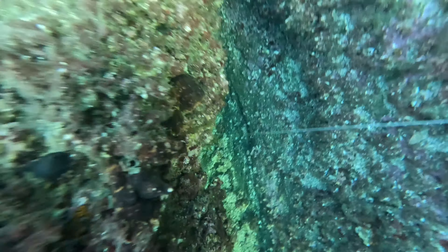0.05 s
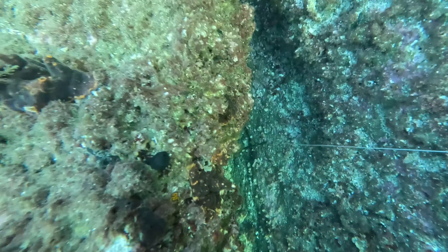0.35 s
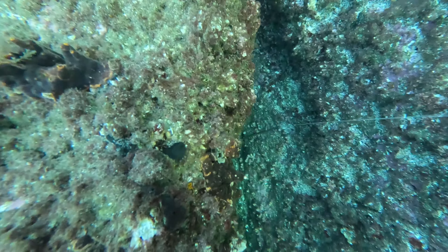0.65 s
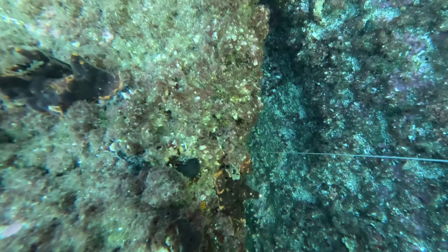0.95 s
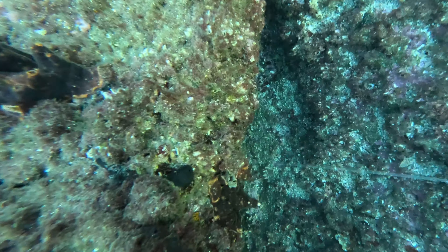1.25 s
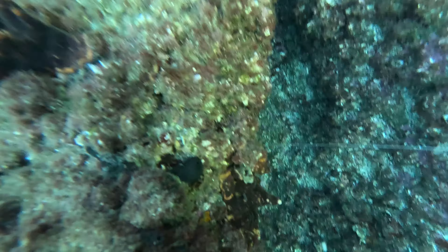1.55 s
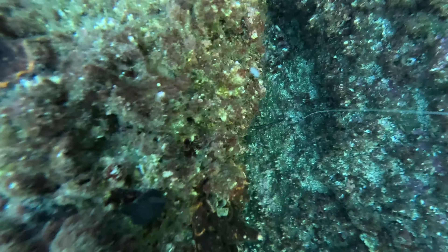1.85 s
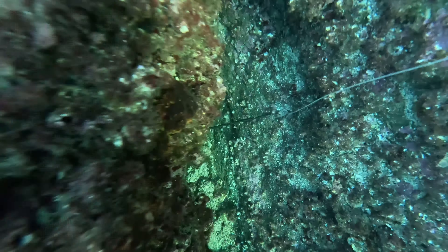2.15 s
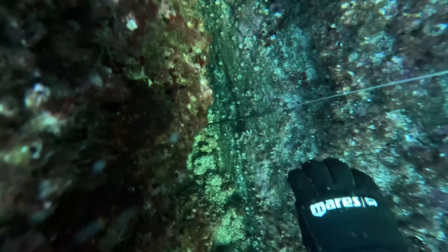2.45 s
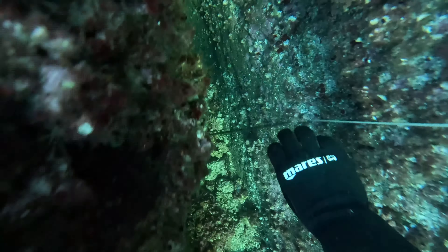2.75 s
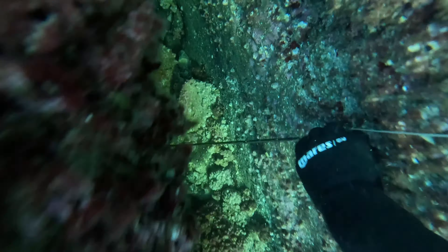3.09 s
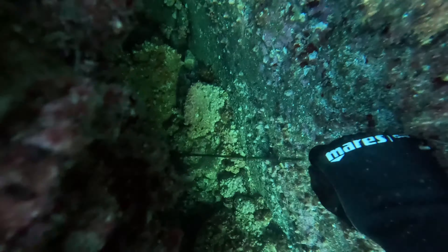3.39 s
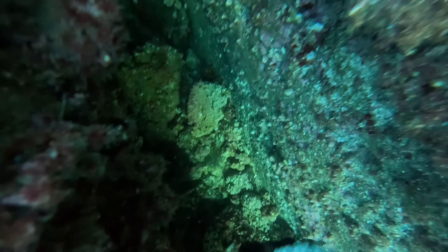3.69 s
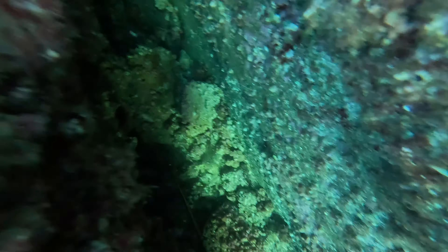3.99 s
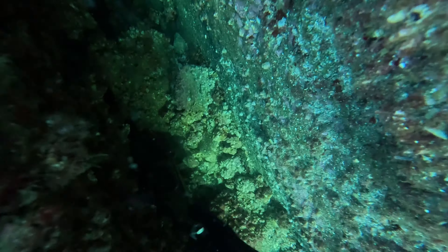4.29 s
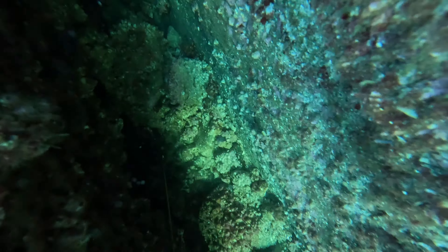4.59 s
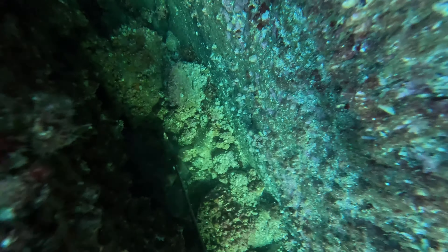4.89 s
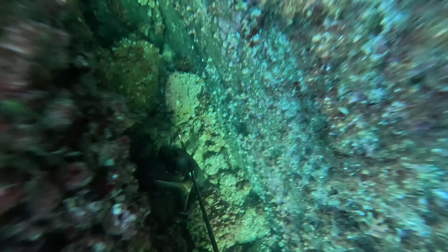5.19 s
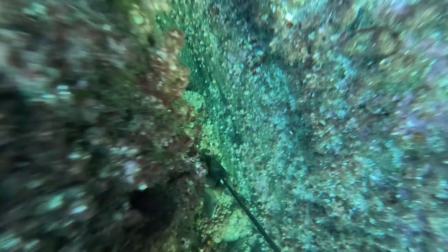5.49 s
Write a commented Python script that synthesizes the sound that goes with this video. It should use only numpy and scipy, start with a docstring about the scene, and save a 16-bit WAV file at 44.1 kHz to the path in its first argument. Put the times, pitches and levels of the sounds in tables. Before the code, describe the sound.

Snapping shrimp crackle underwater throughout, with sharp single ticks nearby and a fine, flickering fizz farther along the reef, all heard from inside a resonant camera housing. Under it runs a low, uneven rumble of water moving past the case. A brief rub and squeak open the sound, followed by a soft gurgle and faint bubble chirps around 0.5 seconds. A small knock comes at 1.3 seconds, and soft, dull water bumps follow between 1.9 and 2.6 seconds. The sharpest snaps stand out near 2.7 to 2.9 seconds. At 3.2 seconds the loudest knock starts a quick run of close clacks, low thumps and rubs lasting until about 3.7. A dull gurgling bump with a short squeak lands near 4 seconds, where the crackle thins slightly. Faint rubbing follows, then two knocks around 4.8 seconds and a gentle swell of water near 5.5.

```python
"""Snapping shrimp crackle all around a diver's camera as it glides along a rocky reef.
Each snap is a tiny bubble collapsing: a few close by, thousands farther out, a fizz beyond.
Two microphones sit inside the waterproof housing, whose resonances colour every tick.
Right at the case, water sloshes past with soft gurgles, dull thumps and a few chirping bubbles;
handling rubs and squeaks on the shell, and knocks make it clack and thump."""
import sys
import numpy as np
from scipy import signal
from scipy.fft import rfft, irfft, next_fast_len
from scipy.io import wavfile
from scipy.ndimage import map_coordinates

SR = 44100
rng = np.random.default_rng(int(sys.argv[2]) if len(sys.argv) > 2 else 0)


def log_audio(samples):
    """Write samples as a 16-bit WAV file to the path given in sys.argv[1]."""
    # one column per channel
    frames = np.atleast_2d(samples).T
    # limit to full scale, then quantise
    limited = np.clip(frames, -1, 1)
    pcm = np.round(limited * 32767).astype(np.int16)
    wavfile.write(sys.argv[1], SR, pcm)


N = 244163
T = np.arange(N) / SR

# The whole reef's crackle along the way. Each row: time in seconds, relative level in dB.
REEF_LEVEL = [(0.0, -46), (0.48, -48), (0.85, -45.5), (1.26, -48), (2.47, -48), (3.55, -51), (4.01, -53.5),
              (5.54, -49.5)]
# Resonances of the housing. Each row: centre in Hz, width in Hz, relative level in dB.
HOUSING_MODES = [(990, 190, -17), (1501, 170, 0.5), (2880, 498, 6.5), (3528, 260, 3), (4107, 200, -2.5),
                 (4986, 475, 4), (5870, 203, -3), (6400, 480, -4.5), (7454, 350, -2.5), (8420, 890, -13.5),
                 (10200, 2200, -28.5), (12100, 1000, -41)]


def amp(db):
    return 10 ** (np.asarray(db) / 20)


def unit_rms(x):
    return x / np.sqrt(np.mean(x ** 2) + 1e-20)


def along(points, hz):
    """(Hz, value) points joined on a log frequency axis."""
    point_hz, values = np.transpose(points)
    return np.interp(np.log(hz + 1), np.log(point_hz + 1), values)


def curve(rows, t):
    """(seconds, value) rows joined by straight lines."""
    return np.interp(t, *np.transpose(rows))


def wobble(rate):
    """A smooth random curve with `rate` knots a second."""
    return map_coordinates(rng.standard_normal(int(N * rate / SR) + 4), [np.arange(N) * rate / SR])


def add(out, start_s, x):
    """Mix x into out at a time."""
    start = round(start_s * SR)
    part = x[max(-start, 0):N - start]
    out[max(start, 0):][:len(part)] += part


def filtered(x, response):
    """Pass x through a complex response, given as a function of Hz."""
    size = 2 * next_fast_len(N // 2 + SR // 4)
    hz = np.fft.rfftfreq(size, 1 / SR)
    return irfft(rfft(x, size) * response(hz), size)[..., :N]


def noise(spectrum):
    """Noise of rms 1, coloured by (Hz, dB) points and rolled off from the last one."""
    white = rng.standard_normal(N)
    top_hz = spectrum[-1][0]
    return unit_rms(filtered(white, lambda hz: amp(along(spectrum, hz)) / (1 + (hz / top_hz) ** 4)))


def resonances(modes, hz):
    """Causal (minimum-phase) response of a set of modes, with a mean power of 1."""
    power = sum(amp(db) ** 2 / (1 + ((hz - centre) / (0.81 * width)) ** 2) ** 2
                for centre, width, db in modes)
    cepstrum = irfft(np.log(power / power.mean() + 1e-12) / 2)
    half = len(cepstrum) // 2
    causal_fold = np.r_[1, np.full(half - 1, 2), 1, np.zeros(half - 1)]
    return np.exp(rfft(cepstrum * causal_fold))


def snaps(times, level_db, bright_db, colour_db, split_hz=4700, spread_s=0.0015, path_count=5):
    """Each snap reaches the case by a few paths and has its own brightness and colour."""
    size = 256
    lead_in = size // 5
    hz = np.fft.rfftfreq(size, 1 / SR)
    delay = lead_in + (rng.uniform(0, spread_s, (len(times), path_count)) * SR).astype(int)
    strength = 0.9 * rng.standard_normal(delay.shape)
    delay[:, 0], strength[:, 0] = lead_in, 1.0  # the direct path
    # every path reaches the two microphones with slightly different strength
    skew = 0.2 * rng.standard_normal(strength.shape) * strength
    paths = np.zeros((2, len(times), size))
    paths[:, np.arange(len(times))[:, None], delay] = strength + skew, strength - skew
    treble = 1 - 1 / (1 + (hz / split_hz) ** 5)
    # the direction of arrival favours different parts of the case: a random gain every 2 kHz or so
    colour = signal.resample(rng.standard_normal((len(times), 11)), len(hz), axis=1)
    spectra = rfft(paths) * amp(bright_db[:, None] * treble + colour_db * colour)
    energy = np.mean(np.abs(spectra * resonances(HOUSING_MODES, hz)) ** 2, axis=(0, 2))
    gain = amp(level_db) * np.sqrt(0.004 * SR / energy)  # level over 4 ms, inside the housing
    pulses = irfft(spectra) * gain[:, None]
    at = (times * SR).astype(int)[:, None] + np.arange(size)
    return np.array([np.bincount(at.ravel(), side.ravel(), N + size)[lead_in:][:N] for side in pulses])


def colony(count=2450, nearest_count=36, top_db=-37.5, fall_db_per_decade=13):
    """Shrimp cover the rock: the farther out, the more of them and the fainter."""
    times = rng.uniform(0, N / SR, count)
    distance_db = top_db - fall_db_per_decade * np.log10(1 + np.arange(count) / nearest_count)
    busy_db = curve(REEF_LEVEL, times) - curve(REEF_LEVEL, T).mean()
    bright_db = -4 + 6 * rng.standard_normal(count)
    return snaps(times, distance_db + busy_db, bright_db, colour_db=4.5)


def far_fizz(gain_db=-9, airy_db=4, stereo_spread=0.056):
    """Far down the reef, the snaps merge into a flickering hiss."""
    hiss = rng.standard_normal(N) + stereo_spread * rng.standard_normal((2, N))
    hiss = filtered(hiss, lambda hz: amp(along([(4000, 0), (9000, airy_db)], hz)))
    flicker_db = 3.3 * wobble(75) + 2.6 * wobble(22.57)
    return amp(curve(REEF_LEVEL, T) + gain_db + flicker_db) * hiss


def rock_echo(x, t60=0.074):
    """A short scatter of echoes off the nearby rock."""
    t = T[:SR // 8]
    tail = rng.standard_normal(len(t)) * amp(-60 * t / t60)
    return signal.fftconvolve(x, tail[None] / np.linalg.norm(tail), axes=1)[:, :N]


def shrimp(echo_db=-18, low_cut_hz=1100):
    """Close snaps, the colony, their echo and the far fizz all come in through the housing."""
    # The shrimp nearest the camera. Each row: start in seconds, relative level in dB,
    # relative treble lift in dB.
    close_snaps = [(0.1403, -36, -14), (0.476, -31.5, -17), (0.5383, -32.5, -17), (0.5862, -38.5, -2),
                   (0.746, -40, -19), (0.7921, -35.5, -10), (0.904, -35, -10), (0.9808, -39, -17),
                   (1.0526, -32, 3.5), (1.454, -39, -22), (1.4658, -31, 6.5), (1.518, -36, -14),
                   (1.624, -39, -24), (1.836, -35, -31), (1.8755, -37.5, -9), (2.1956, -46, 9),
                   (2.2092, -36, -31), (2.665, -35.5, -10), (2.6984, -27.5, 1.5), (2.7992, -44.5, -1),
                   (2.8626, -35, -27), (2.87, -30.5, 15.5), (2.9306, -39, -25), (3.847, -58, 4),
                   (4.067, -28.5, -12), (4.203, -40.5, 1), (4.4379, -30, -14), (4.5261, -38.5, -2),
                   (5.1605, -37, -6), (5.2438, -37.5, -13), (5.3389, -38, -7)]
    times, level_db, bright_db = np.transpose(close_snaps)
    crackle = snaps(times, level_db + 1, bright_db + 5, colour_db=2) + colony()
    # a tiny collapsing bubble radiates hardly any low sound
    crackle = signal.sosfilt(signal.butter(2, low_cut_hz, "high", fs=SR, output="sos"), crackle)
    outside = crackle + far_fizz() + amp(echo_db) * rock_echo(crackle)
    return filtered(outside, lambda hz: resonances(HOUSING_MODES, hz))


def sloshing(gain_db=6, unrest_db=2):
    """Slow pressure swings on the case as it moves through the water."""
    # The flow past the case. Each row: time in seconds, relative level in dB.
    flow_level = [(0.0, -38), (0.17, -49), (1.96, -47.5), (2.07, -45), (2.11, -45), (3.64, -38),
                  (3.85, -47.5), (3.98, -37.5), (4.29, -51), (4.35, -44), (5.4, -54), (5.54, -39.5)]
    # Its deep rumble. Each row: frequency in Hz, relative level in dB.
    flow_spectrum = [(12, 4), (22, -2), (38, -0.5), (62, -15), (100, -15.5), (150, -25), (250, -43.5),
                     (450, -58.5), (650, -82), (950, -61), (1500, -46)]
    return amp(curve(flow_level, T) + gain_db + unrest_db * wobble(11)) * noise(flow_spectrum)


def low_swells(side_db=-7, side_hz=380):
    """Low swells at the case: soft gurgles and a few brief, dull thumps."""
    # Each row: middle in seconds, half length in seconds, relative level in dB.
    swells = [(.015, 0.017, -34), (.29, 0.038, -44.5), (.52, 0.035, -35.5), (.865, 0.031, -49.5),
              (1.344, 0.0032, -28), (2.38, 0.032, -48.5), (3.258, 0.013, -32.5), (3.53, 0.11, -46),
              (3.905, .028, -34.5), (3.964, 0.0066, -22.5), (4.025, 0.032, -34.5), (5.48, 0.13, -48.5)]
    # Their dull colour. Each row: frequency in Hz, relative level in dB.
    swell_spectrum = [(50, 6), (100, 8), (160, 9), (230, -2), (310, -13), (380, -14.5), (470, -32),
                      (600, -32), (900, -74), (2000, -67)]
    # the upper part differs at the two microphones
    side = filtered(noise(swell_spectrum), lambda hz: hz ** 2 / (hz ** 2 + side_hz ** 2))
    low_noise = noise(swell_spectrum) + amp(side_db) * np.array([side, -side])
    envelope = sum(amp(db) / (1 + ((T - middle_s) / half_s) ** 2 / 2) ** 2
                   for middle_s, half_s, db in swells)
    return envelope * low_noise


def microphone_rush(level_db=-59):
    """A soft rush, separate at each microphone, that rises and falls with the reef."""
    # The colour of the rush. Each row: frequency in Hz, relative level in dB.
    rush_spectrum = [(20, 14.5), (60, -6.5), (130, -15), (250, -22.5), (450, -24.5), (900, -23),
                     (2000, -19.5), (4000, -45), (7000, -22), (10000, -24.5), (13000, -31), (17000, -64)]
    reef_db = curve(REEF_LEVEL, T)
    envelope = amp(level_db + 0.5 * (reef_db - reef_db.mean()))
    return envelope * np.array([noise(rush_spectrum), noise(rush_spectrum)])


def glides(rows, pitch_change, waver=0.037, stutter_db_at_2khz=3):
    """Brief, unsteady tones that glide by a share of their pitch; higher ones stutter more."""
    out = np.zeros(N)
    unsteady = 1 + waver * wobble(500)
    stutter = wobble(220)
    for start_s, length_s, start_hz, db in rows:
        progress = np.clip((T - start_s) / length_s, 0, 1)
        hz = start_hz * (1 + pitch_change * progress) * unsteady
        level_db = db + stutter_db_at_2khz * stutter * start_hz / 2000
        out += amp(level_db) * np.sin(np.pi * progress) * np.sin(2 * np.pi * np.cumsum(hz) / SR)
    return out


def squeaks():
    """Rubbing on the case sticks and slips; the pitch falls as each slip slows."""
    # Each row: start in seconds, length in seconds, starting pitch in Hz, relative level in dB.
    slips = [(.005, .031, 2955, -43), (1.338, 0.012, 330, -39.5), (3.595, 0.014, 3400, -35),
             (3.923, 0.042, 1070, -44), (3.954, .017, 423.4, -29), (4.26, .07, 3100, -54),
             (4.52, .06, 3770, -52)]
    return glides(slips, pitch_change=-0.144)


def shell_ring(force, main_hz, sharpness=1.95, floor=0.066):
    """The shell answers a force; the place of contact favours the modes near one frequency."""
    # The shell's modes under contact. Each row: centre in Hz, width in Hz, relative level in dB.
    shell_modes = [(328, 137, 2.5), (660, 280, -0.5), (920, 183, 3), (1380, 150, 1), (1560, 105, 3),
                   (1860, 96, 1), (2900, 690, -1.5), (3620, 280, -0.5), (6200, 3200, -9)]
    size = 2 * next_fast_len(len(force) // 2 + 1024)
    hz = np.fft.rfftfreq(size, 1 / SR)
    focus = 1j * hz * main_hz / (sharpness * (main_hz ** 2 - hz ** 2) + 1j * hz * main_hz)
    response = resonances(shell_modes, hz) * (floor + focus)
    return irfft(rfft(force, size) * response / np.sqrt(np.mean(np.abs(response) ** 2)))


def rubs(rough_db=4):
    """Uneven friction on the shell, right beside the microphones."""
    # Each row: middle in seconds, half length in seconds, relative level in dB, main frequency in Hz.
    strokes = [(0.019, 0.016, -36.5, 2850), (0.357, 0.028, -57.5, 794), (0.695, 0.088, -61.5, 1020),
               (1.323, 0.014, -44, 1490), (2.009, 0.019, -58, 940), (3.25, 0.035, -41.5, 1240),
               (3.389, 0.096, -58.5, 950), (3.593, 0.055, -45.5, 3020), (3.766, 0.035, -52.5, 685),
               (3.946, .055, -48, 546), (4.288, 0.12, -58, 3300), (4.52, 0.083, -59, 3370)]
    out, t = np.zeros(N), T[:SR // 4]
    centre_s, knots = t.mean(), t[::150]
    for middle_s, half_s, db, main_hz in strokes:
        grip = amp(rough_db * np.interp(t, knots, rng.standard_normal(len(knots))))
        envelope = np.exp(-((t - centre_s) / half_s) ** 2)
        force = unit_rms(grip * rng.standard_normal(len(t))) * envelope
        add(out, middle_s - centre_s, amp(db) * shell_ring(force, main_hz))
    return out


def bubbles():
    """Small bubbles chirp upwards as they near release."""
    # Each row: start in seconds, length in seconds, starting pitch in Hz, relative level in dB.
    chirps = [(.49, 0.077, 261.5, -53), (.615, 0.038, 1050, -56), (1.995, 0.021, 808, -58)]
    return glides(chirps, pitch_change=0.39)


def thump(db, hz, t60, rise_s=0.0058, gain_db=5):
    """The whole case rocks at a low, quickly damped note."""
    t = T[:SR // 5]
    attack = 1 - np.exp(-(t / rise_s) ** 2)
    return amp(db + gain_db - 60 * t / t60) * attack * np.sin(2 * np.pi * hz * t)


def knocks(blow=5.1, grit_db=-43.5, grit_db_per_db=0.18, grit_bright_db=6):
    """A handling knock is a sharp blow and a brief gritty scrape on the shell, then a thump."""
    # Each row: start in seconds, relative clack level in dB, clack frequency in Hz, scrape decay time
    # in seconds, relative thump level in dB, thump pitch in Hz, seconds for the thump to fall 60 dB.
    hits = [(1.338, -26.5, 820, 0.0047, -27.5, 112, 0.11), (3.2196, -19.5, 1296, 0.0035, -8.5, 139, 0.03),
            (3.281, -34, 720, 0.01, -21.5, 129, 0.044), (3.342, -42.5, 740, 0.0046, -34, 144, .05),
            (3.393, -37.5, 1110, 0.006, -24.5, 125, 0.1), (3.447, -29.5, 865, 0.0065, -19, 112.6, .093),
            (3.545, -34.5, 1370, 0.0019, -63, 131, .05), (3.612, -26.5, 910, 0.013, -17.5, 136.4, 0.098),
            (3.642, -33.5, 1700, 0.0022, -18, 126, 0.076), (4.583, -47.5, 1560, 0.0056, -33, 113.6, 0.076),
            (4.785, -35, 940, 0.0025, -30, 114, .12), (4.829, -36.5, 920, 0.0035, -20, 117.6, 0.11)]
    out, grit, t = np.zeros(N), np.zeros(N), T[:SR // 5]
    average_clack_db = np.mean(hits, axis=0)[1]
    for start_s, clack_db, clack_hz, scrape_s, thump_db, thump_hz, t60 in hits:
        force = rng.standard_normal(len(t)) * np.exp(-t / scrape_s) + blow * (t == 0)
        add(out, start_s, amp(clack_db) * shell_ring(force, clack_hz))
        add(grit, start_s, amp(grit_db + grit_db_per_db * (clack_db - average_clack_db)) * force)
        add(out, start_s, thump(thump_db, thump_hz, t60))
    treble_lift = [(3500, 0), (7000, grit_bright_db)]
    return out + filtered(grit, lambda hz: resonances(HOUSING_MODES, hz) * amp(along(treble_lift, hz)))


def water_bumps():
    """Soft bumps of water against the case, which only thump."""
    # Each row: start in seconds, relative level in dB, pitch in Hz.
    bumps = [(1.894, -41, 108), (2.038, -21, 40.4), (2.028, -42.5, 139), (2.262, -37.5, 137),
             (2.418, -38, 134), (2.559, -41, 107), (3.29, -24, 36.5), (3.902, -26, 155)]
    out = np.zeros(N)
    for start_s, db, hz in bumps:
        add(out, start_s, thump(db, hz, t60=0.1))
    return out


def microphones(x):
    """The two microphones sit differently in the case: each gets its own share and phase of a mode."""
    # Balance across the pair. Each row: frequency in Hz, left minus right in dB.
    balance = [(250, 0), (800, -2), (1200, -4.5), (1550, 0), (2050, 7), (2800, 5), (3400, 6.5), (3950, 7),
               (4600, 0), (5600, -2), (6300, 0), (6900, -2), (7800, .5), (10000, 2)]
    # Phase across the pair. Each row: frequency in Hz, lead of the left in radians.
    phase_lead = [(250, 0), (1100, .7), (1450, .4), (2100, 1.5), (2400, .9), (2950, 1), (3450, -.6),
                  (3750, -.7), (4100, .6), (4900, .15), (5700, .35), (7000, 0)]

    def pair(hz):
        left = amp(along(balance, hz) / 2) * np.exp(0.5j * along(phase_lead, hz))
        return np.array([left, 1 / left])
    return filtered(x, pair)


def scene():
    """Reef, handling and water, as heard from inside the case."""
    handling = knocks() + rubs() + squeaks()
    reef = shrimp()
    water = sloshing() + low_swells() + bubbles() + water_bumps()
    return microphones(reef + handling + water) + microphone_rush()


def record(dry, top_hz=14900):
    """The camera keeps nothing above its band limit."""
    return filtered(dry, lambda hz: hz < top_hz)


dry = scene()
out = record(dry)
log_audio(out)
```